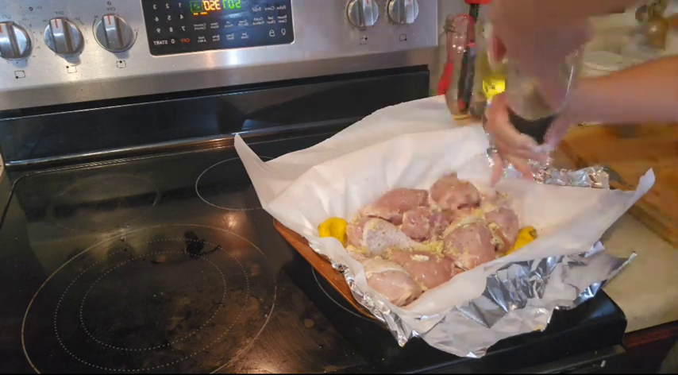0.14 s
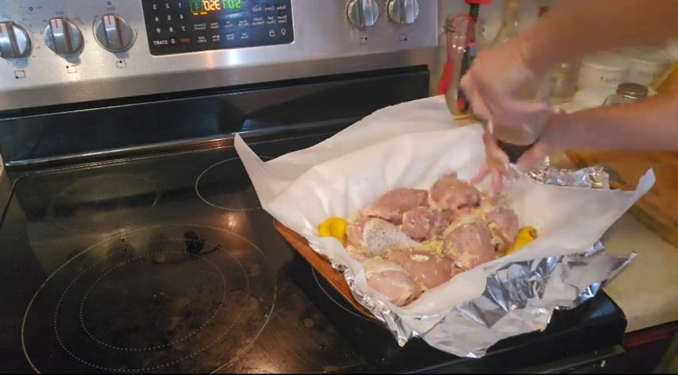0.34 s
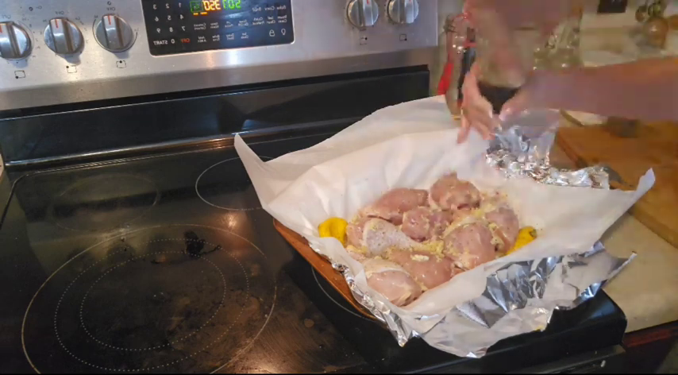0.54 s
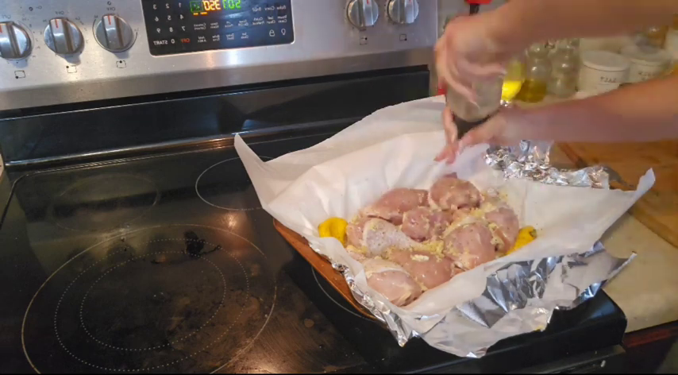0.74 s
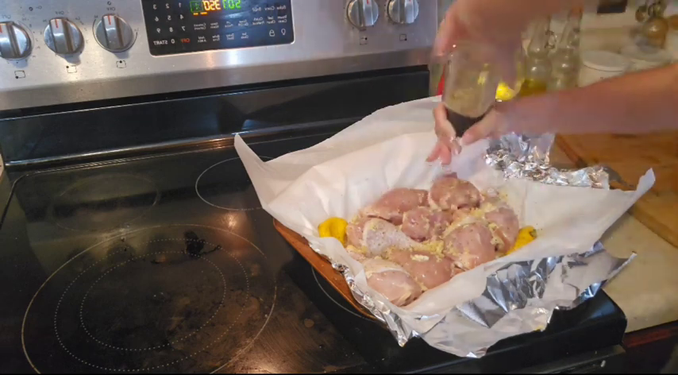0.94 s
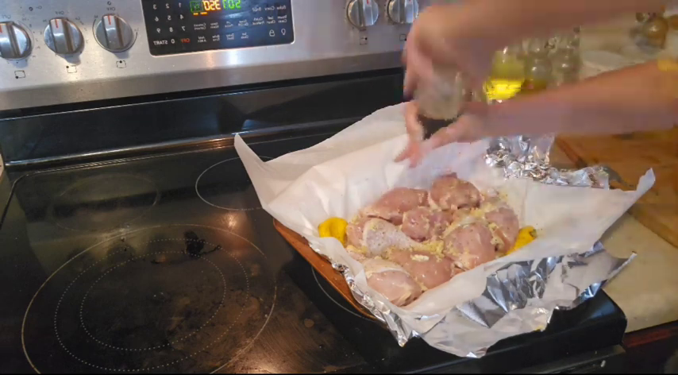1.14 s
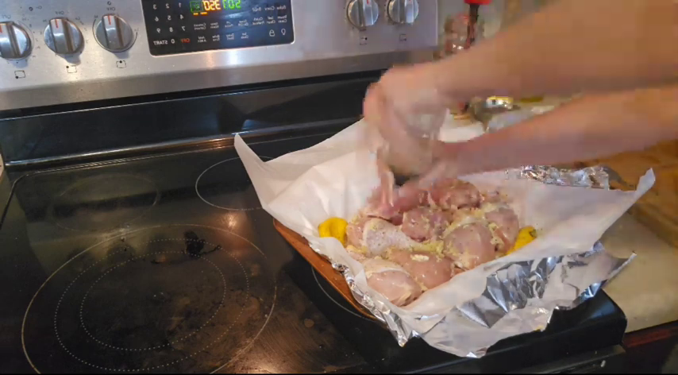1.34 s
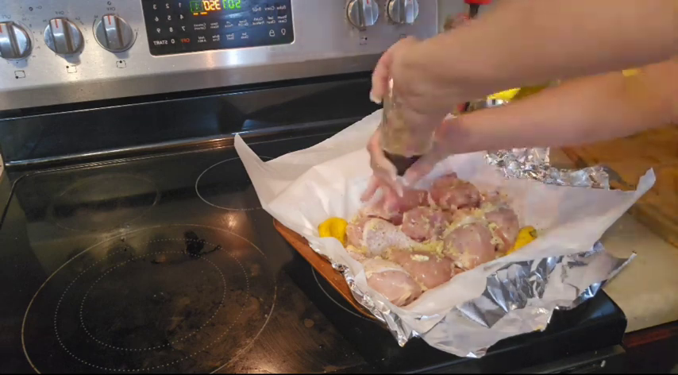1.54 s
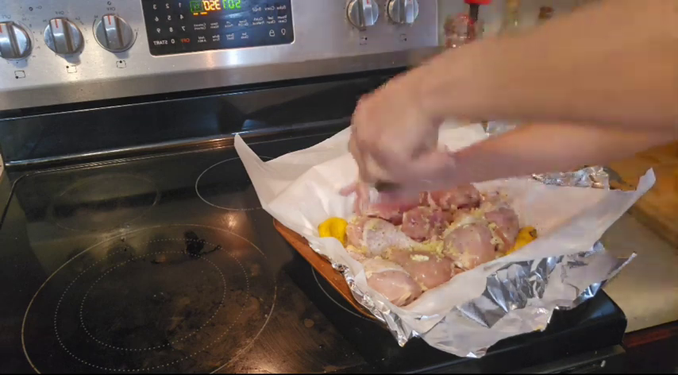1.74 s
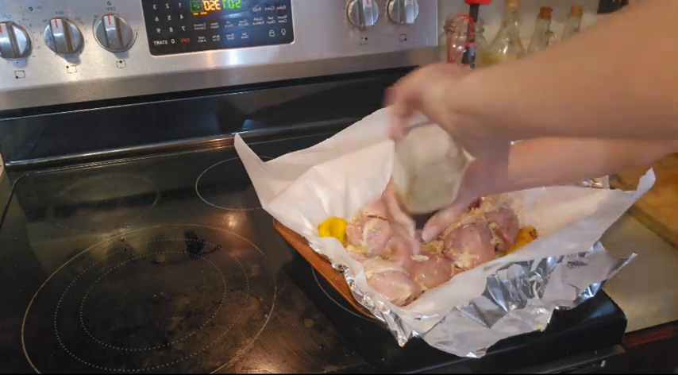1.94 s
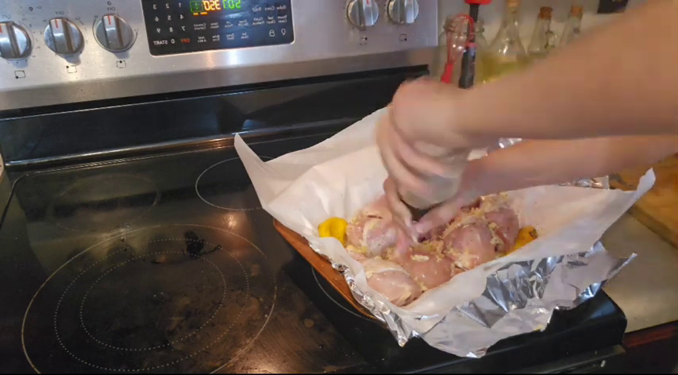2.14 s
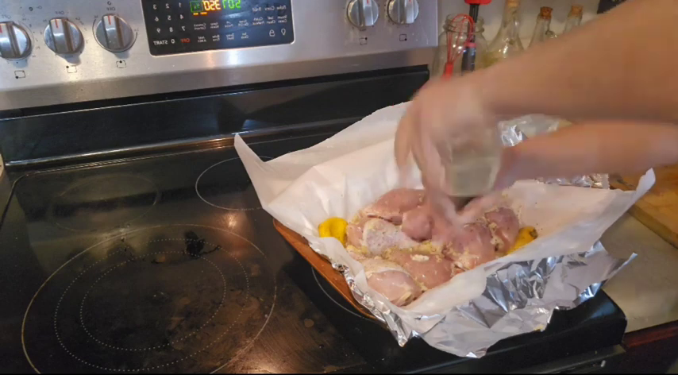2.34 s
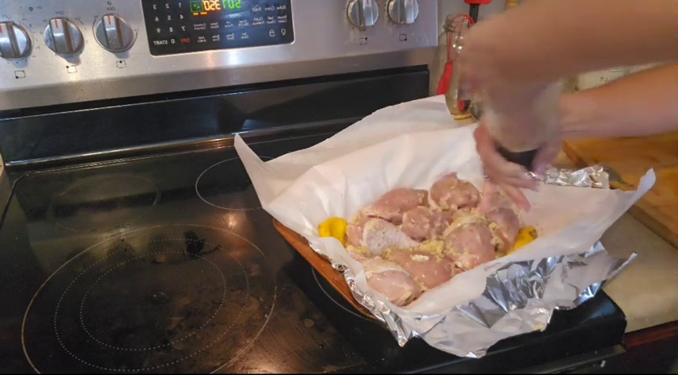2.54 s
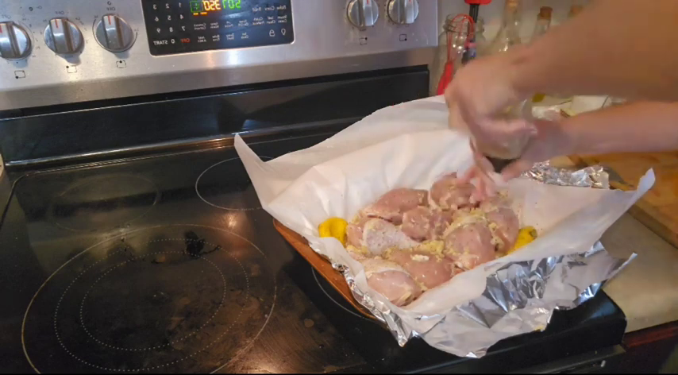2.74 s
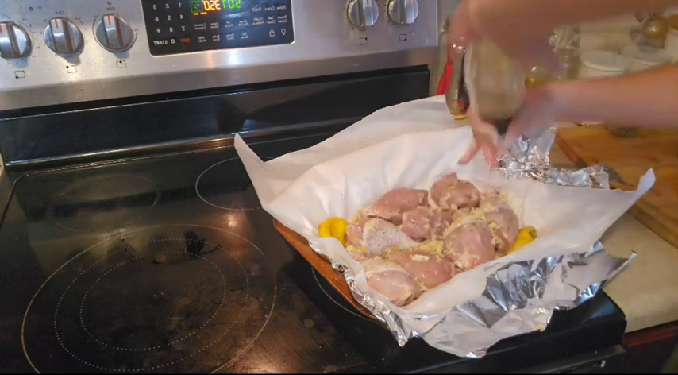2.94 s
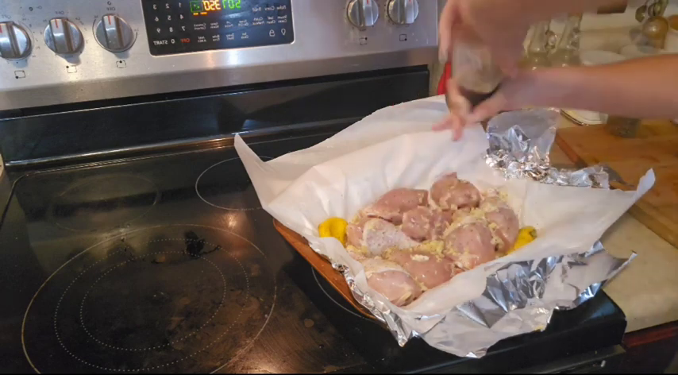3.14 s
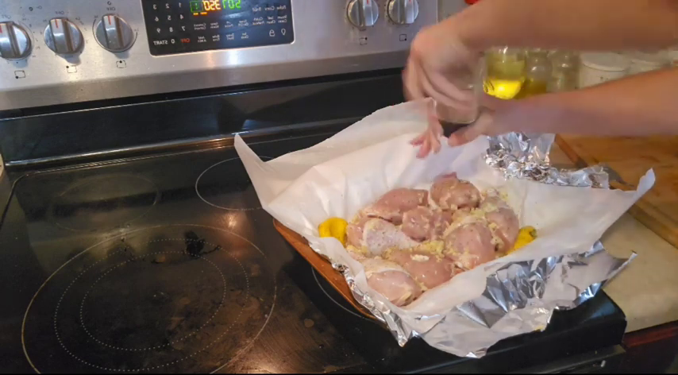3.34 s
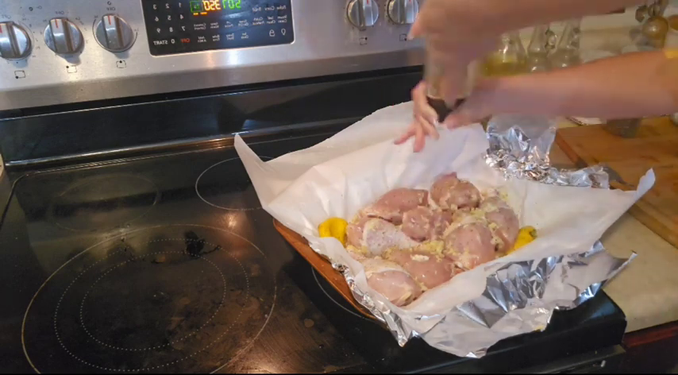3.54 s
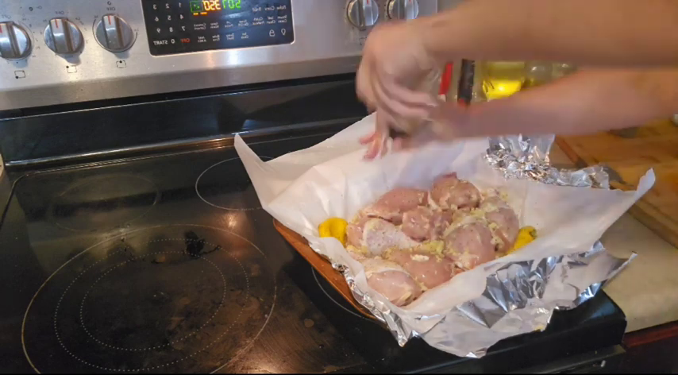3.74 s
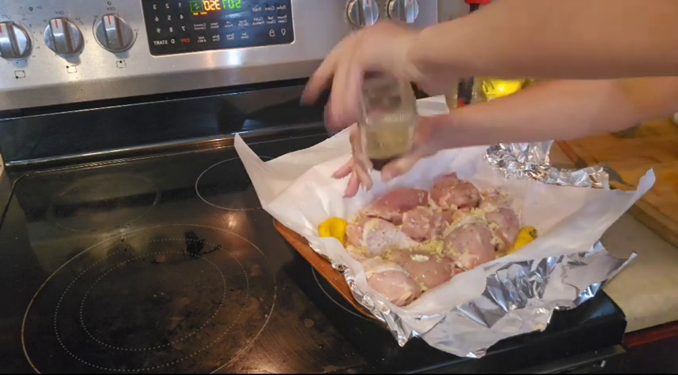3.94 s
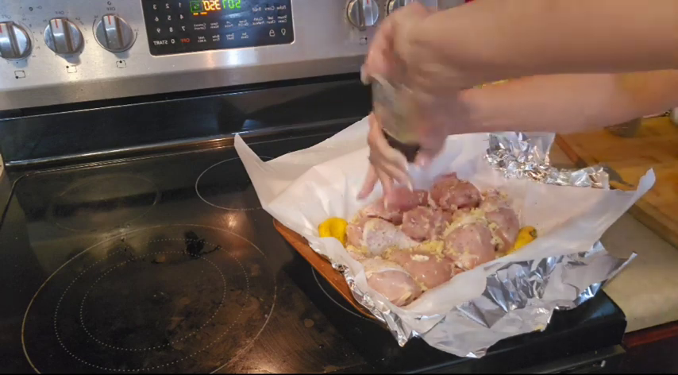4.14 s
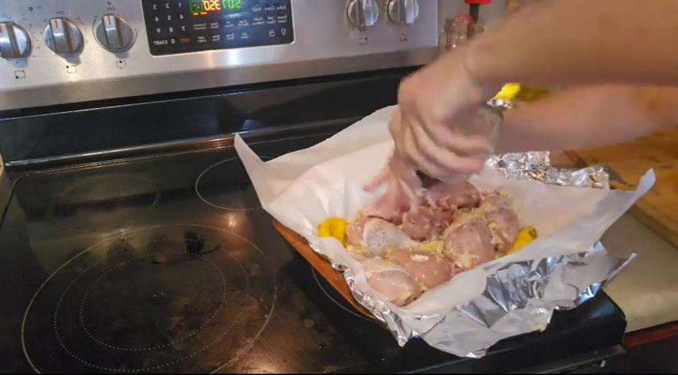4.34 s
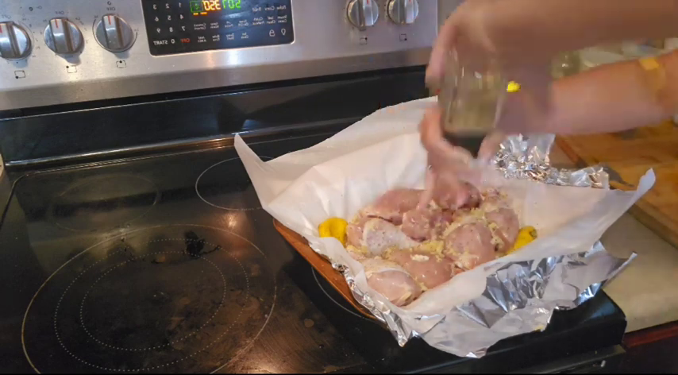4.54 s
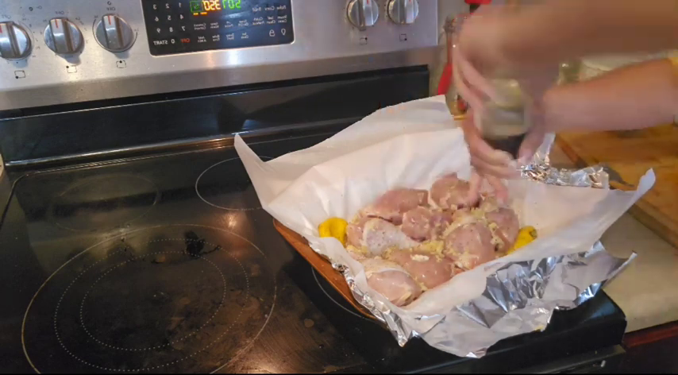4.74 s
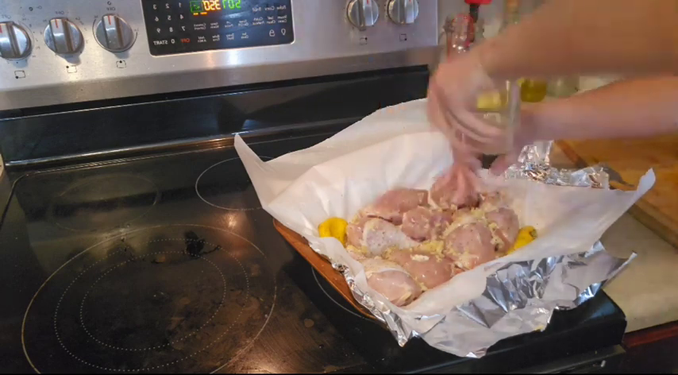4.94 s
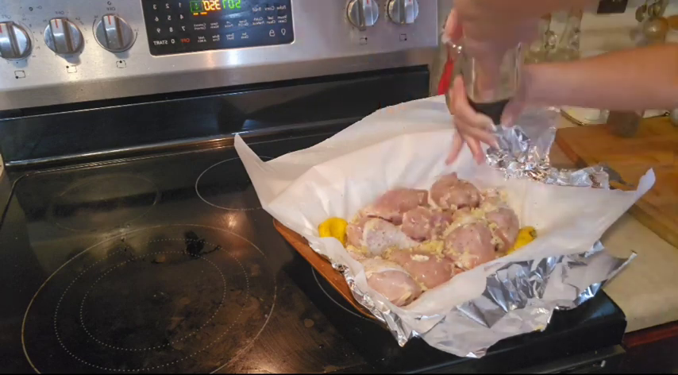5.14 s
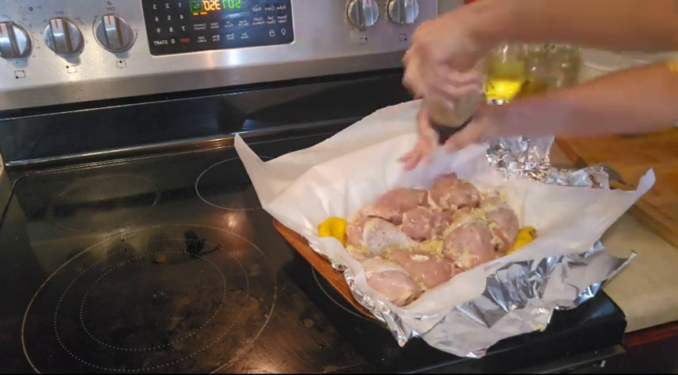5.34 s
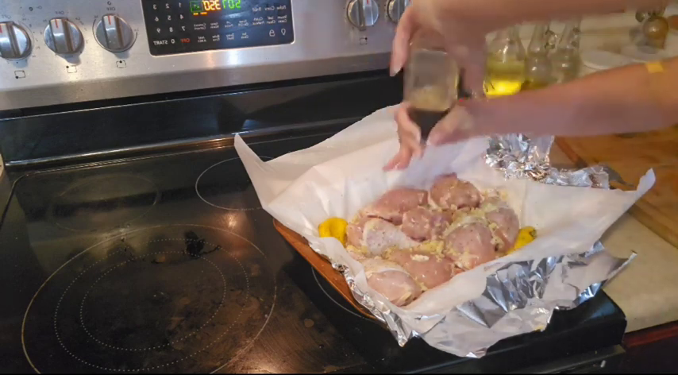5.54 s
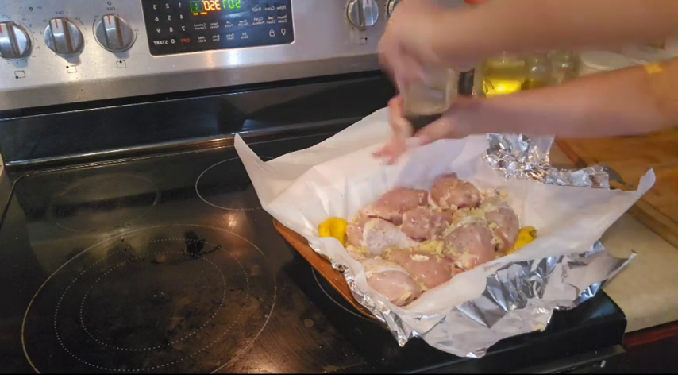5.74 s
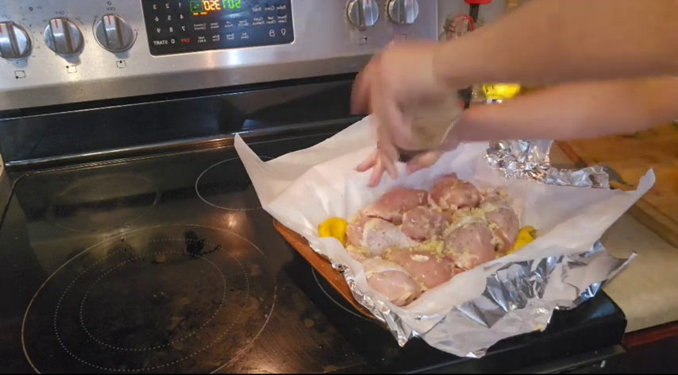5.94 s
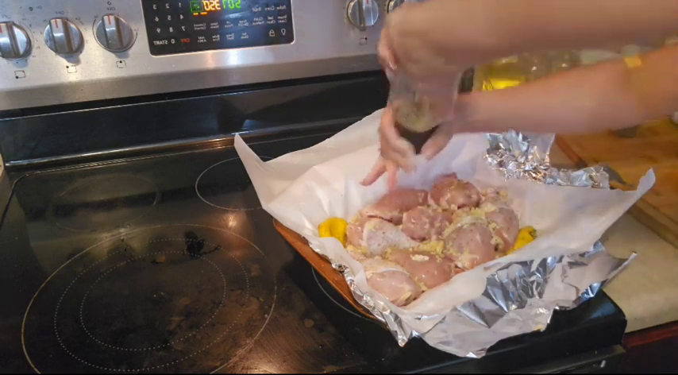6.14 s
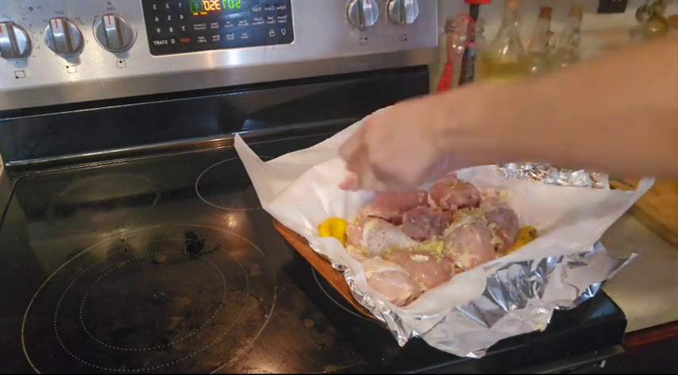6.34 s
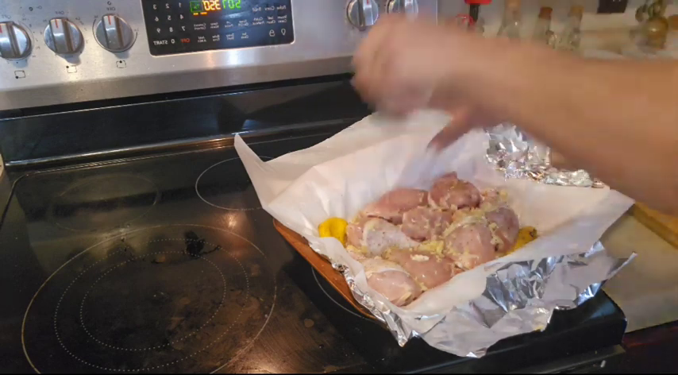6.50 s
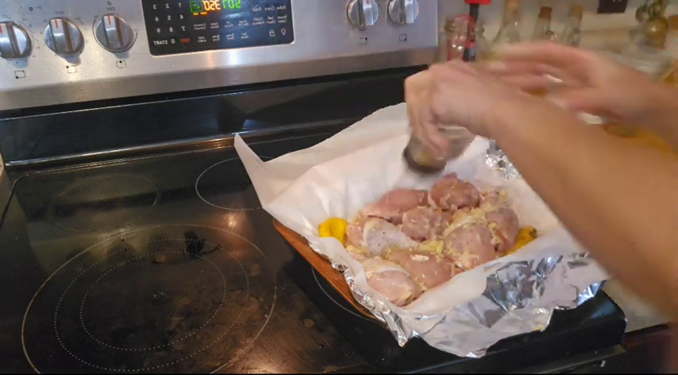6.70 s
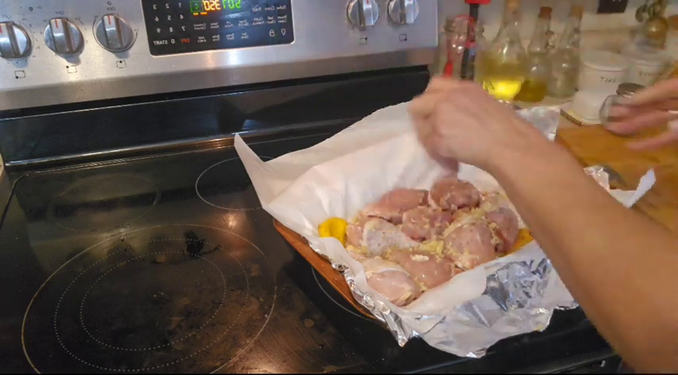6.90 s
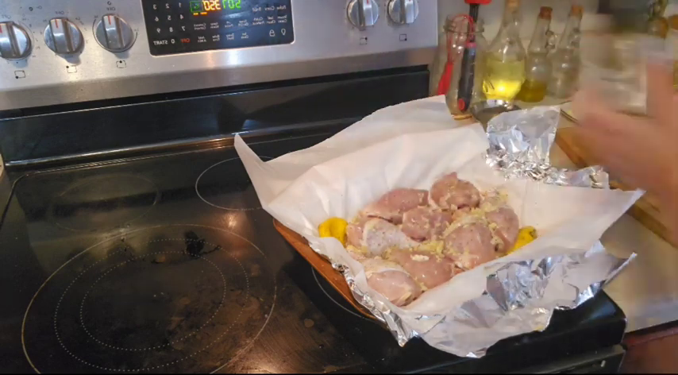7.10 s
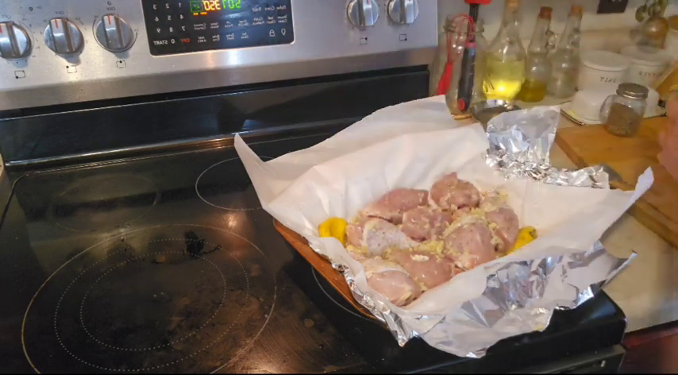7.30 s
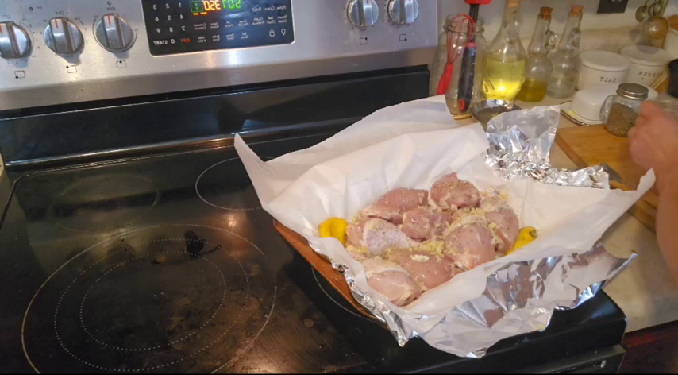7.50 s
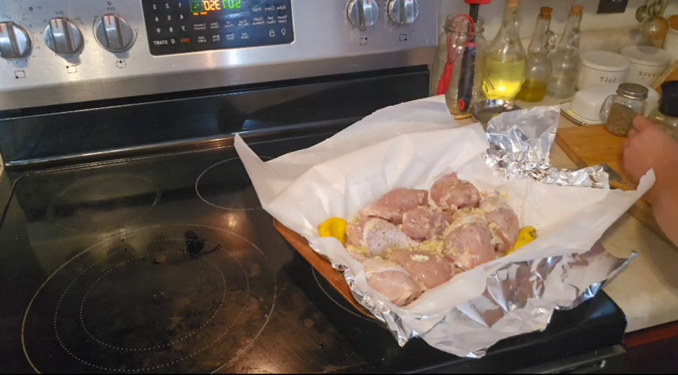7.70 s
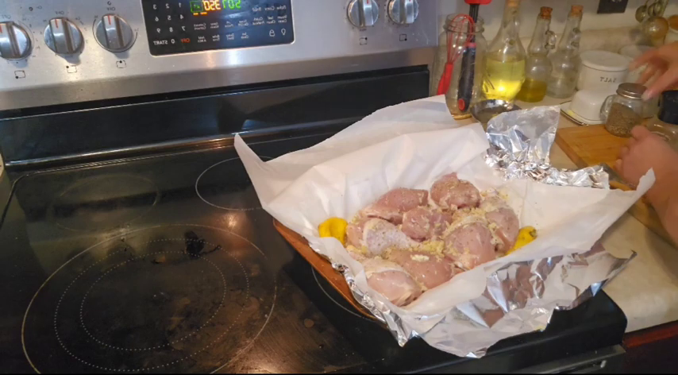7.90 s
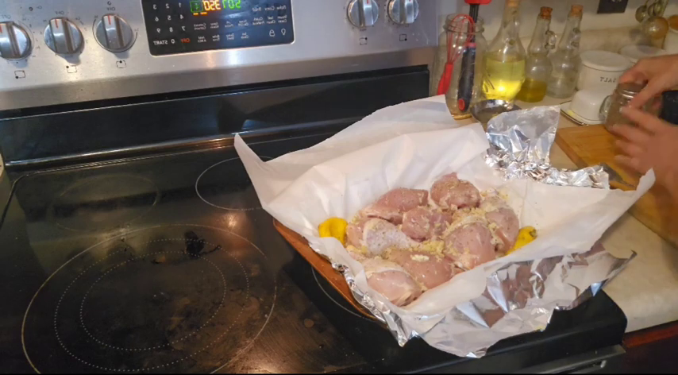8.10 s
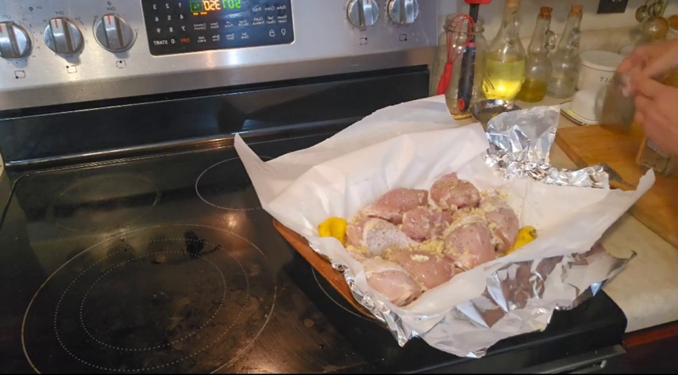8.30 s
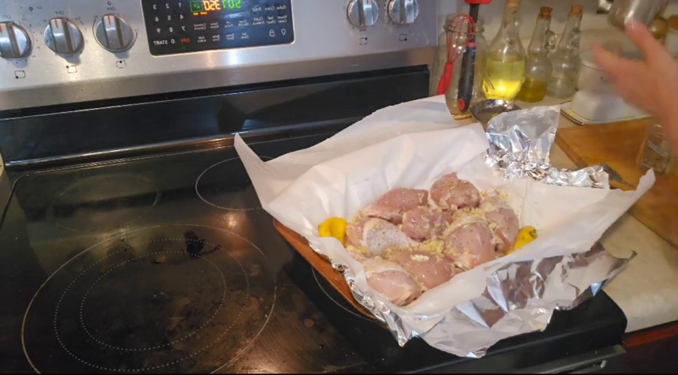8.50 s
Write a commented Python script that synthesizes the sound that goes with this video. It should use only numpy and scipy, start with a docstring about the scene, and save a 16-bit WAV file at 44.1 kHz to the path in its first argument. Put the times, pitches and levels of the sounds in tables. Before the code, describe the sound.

In a small, hard-walled kitchen, a glass herb grinder is twisted about thirteen times, roughly twice a second. Each twist is a brief, crisp crunch of dried leaves, with sharp little stalk cracks around it. Then fingers rub and softly bump the jar, and it is set down on a wooden board with a hollow knock. A low appliance hum runs throughout, heard in stereo from nearby.

```python
"""In a small, hard-walled kitchen, a glass herb grinder is twisted thirteen times over a tray of chicken.
Each twist crushes dried leaves: many tiny breaks make a dense crunch, and stalks give sharp cracks.
Between twists, skin rubs on the jar as the hand slides to a new grip. At the end the grinder is set
down on a wooden board, which knocks and rings. An appliance hums throughout."""
import sys
import numpy as np
from scipy import signal
from scipy.fft import rfft, irfft
from scipy.io import wavfile
from scipy.ndimage import uniform_filter1d

SR = 44100
rng = np.random.default_rng(int(sys.argv[2]) if len(sys.argv) > 2 else 0)


def bounce(signal):
    """Save signal as a 16-bit WAV file at the path given by the first command-line argument."""
    frames = np.transpose(np.atleast_2d(signal))
    limited = np.clip(frames, -1, 1)
    pcm = np.round(limited * 32767).astype(np.int16)
    wavfile.write(sys.argv[1], SR, pcm)


N = 381906
TIME = np.arange(N) / SR
HZ = np.fft.rfftfreq(N, 1 / SR)


# the tone of breaking leaves: f/Hz, relative level/dB
LEAF_TONE = [(530, -42.5), (900, -7), (965, -7.5), (1060, -9.5), (1810, -6), (2150, -3), (2450, -5),
             (2810, -3), (3720, -5), (6200, -0.5), (6730, -2.5), (7740, -0.5), (9320, -6), (13400, -5),
             (14500, -13)]
# twists of the grinder: start t/s, length t/s, end level/dB, rise over the twist/dB,
# boost from the ringing cap/dB, cap's note f/Hz, note's relative level/dB
TWISTS = [(0.288, 0.12, -39.5, 11.5, 2, 2920, -8), (0.783, 0.1, -48, -3.5, -1, 2870, -1),
          (1.221, 0.17, -47.5, 1, 1, 2930, 1), (1.721, 0.098, -39.5, 9.5, 4.5, 2700, -10),
          (2.25, 0.085, -43, 8.5, 5, 2800, -2.5), (2.742, 0.15, -51, -5, 3, 2630, -11),
          (3.248, 0.092, -43, 8.5, 4, 2800, -19), (3.759, 0.15, -44, 8.5, 3.5, 2780, -9),
          (4.335, 0.073, -41, 14, 3, 2850, -12), (4.85, 0.17, -45.5, 7.5, 1.5, 2710, 0),
          (5.347, .11, -45, 0.5, 3.5, 2760, -4), (5.829, 0.12, -46, 3, 3.5, 2730, 2),
          (6.319, 0.089, -45.5, 1.5, 6, 2220, 2)]

def grinding():
    """Leaves crumble between the grinder's teeth; the plastic cap rings differently with each grip."""
    crunch = unit(colour(fractures(per_s=700, spread_db=2.0, snap_s=0.00029), LEAF_TONE))
    rows = np.array(TWISTS)
    grip = np.maximum(np.searchsorted(rows[:, 0], TIME) - 1, 0)
    ring_db, note_hz, note_db = rows[grip, 4:].T
    note_hz = note_hz * (1 + 0.037 * drift(hz=12))  # the note wanders as the fingers press
    body = (amp(ring_db) - 1) * band(crunch, 2170, 3500)
    hollow = amp(note_db + ring_db) * resonate(crunch, note_hz, width_hz=340)
    effort = sum(push(*twist[:4], fade_db_per_s=243) for twist in TWISTS)
    # loose leaves scratch faintly just before the teeth bite
    scratch = amp(-61.5) * sum(swell(s - 0.0081, half_s=0.016) for s, *_ in TWISTS)
    uneven_feed = amp(2.4 * drift(hz=45))
    return (effort + scratch) * uneven_feed * (crunch + body + hollow)


def push(start, length, db, rise_db, fade_db_per_s, attack_s=0.011, arch_db=1):
    """The loudness of one twist: the teeth bite at once, work extra hard midway, then let go."""
    t = TIME - start
    done = np.clip(t / length, 0, 1)
    shape_db = rise_db * (done - 1) + arch_db * np.sin(np.pi * done)
    fade_db = fade_db_per_s * np.maximum(t - length, 0)
    return np.clip(t / attack_s, 0, 1) * amp(db + shape_db - fade_db)


def fractures(per_s, spread_db, snap_s, kinds=16):
    """A steady stream of tiny breaks of uneven size, each a very short snap of noise."""
    sizes = amp(spread_db * np.minimum(rng.exponential(1, N), 4))
    breaks = sizes * (rng.random(N) < per_s / SR)
    breaks /= np.sqrt(abs(uniform_filter1d(breaks ** 2, size=1100)) + 1e-3)  # even out the loudness
    kind, t = rng.integers(0, kinds, N), TIME[:256]
    snaps = rng.standard_normal((kinds, 2, len(t))) * np.exp(-t / snap_s)
    streams = (signal.oaconvolve((breaks * (kind == k))[None], unit(snaps[k]), axes=1)
               for k in range(kinds))
    return unit(sum(streams)[:, :N])


# single cracks: t/s, level/dB, boost near 3 kHz/dB, boost at 11 kHz/dB
STALK_CRACKS = [(.2382, -52, -1.5, 1), (0.3394, -52, 14, -16), (0.642, -62.5, 7, -22),
                (0.806, -45.5, 0, -3), (0.8736, -55, 2, -9), (1.2243, -61, 3, -43), (1.3179, -50.5, 14, -9),
                (1.337, -55, 13, -10), (1.3948, -38.5, 6.5, -7), (1.729, -48.5, -6, -5),
                (1.9764, -56.5, 10, -27), (1.993, -52.5, -4, -8), (2.0772, -55, 1, -14),
                (2.1887, -56, -3, -9), (2.308, -45, 1, 1), (2.5322, -55.5, -6, -4.5), (2.6594, -64, 2, -4),
                (2.7442, -59, -3, -9), (2.8745, -48.5, 3, 0), (3.0812, -57, 11.5, -37),
                (3.2712, -50.5, -19, -7), (3.4403, -54, 3, -1), (3.628, -60, 9, -24),
                (3.7666, -49.5, 0, -4), (3.891, -46.5, 5, 3), (4.335, -53, 5, -4), (4.4259, -43, 9.5, -6),
                (4.5869, -54, 9.5, -20), (4.6108, -55, -3, -13), (4.733, -62, -18, -28),
                (4.765, -54, 1, -1), (4.8332, -57, -1, -10), (4.8575, -49, 3, -1), (4.891, -52.5, 11, 4),
                (5.013, -45.5, -5, -12), (5.1088, -55, -3, -8), (5.156, -59, 9, -5), (5.3502, -57, 0, -22),
                (5.4021, -41, -23, -3), (5.4486, -49.5, 4, -9), (5.7, -62.5, -5, -5), (5.8905, -50, -10, 2),
                (5.9424, -46, 10, 1), (6.07, -60, 4, -7), (6.105, -59.5, -8, -8), (6.342, -48.5, 4, -7),
                (8.292, -63, 11, -2)]

def cracks(crumbs_per_s=4, tries=64):
    """Stalks crack and the cap's teeth catch; faint crumbs snap at random from first twist to last."""
    out = np.zeros((2, N))
    for s, *piece in STALK_CRACKS:
        add(out, s, crack(*piece))
    first_s = TWISTS[0][0]
    span_s = TWISTS[-1][0] - first_s
    for when, chance, size in rng.random((tries, 3)):
        crumb = crack(db=-69 + 4 * size, body_db=7, edge_db=-35)
        if chance < crumbs_per_s * span_s / tries:
            add(out, first_s + when * span_s, crumb)
    return colour(out, LEAF_TONE)


def crack(db, body_db, edge_db):
    """One piece breaks: a sharp snap, then a short spill of crumbs."""
    t = TIME[:2048]
    fall = np.exp(-t / 0.0013) + amp(-24.5) * np.exp(-t / 0.014)
    rise_s = np.interp(db, [-54.5, -43.5], [.0011, .0003])  # big pieces part at once, small ones give way
    burst = rng.standard_normal((2, len(t))) * fall * (1 - np.exp(-t / rise_s))
    click_at = 20 + rng.choice(np.arange(3), size=2)  # the click reaches each side at its own instant
    burst[[0, 1], click_at] += amp(np.interp(db, [-61.5, -41.5], [3, 14]))
    tone = [(900, body_db - 17), (1600, body_db - 10), (2300, body_db - 4), (3200, body_db),
            (4800, 0), (8000, 0), (11000, edge_db)]
    return amp(db) * unit(colour(burst, tone))


# the jar's blows on the board: t/s, relative level/dB
JAR_BLOWS = [(7.9933, 5), (7.998, -18), (8.005, 0.5), (8.015, -7.5)]
# the tone of the knock: f/Hz, relative level/dB
KNOCK_TONE = [(100, -28), (300, 4), (450, -2), (700, 0), (950, -5.5), (1200, -7.5), (1500, -16.5),
              (2000, -11.5), (2800, -25), (4500, -27.5), (6500, -24.5), (8000, -39.5), (11000, -72)]
# the notes of the board and counter: f/Hz, relative level/dB, time to fade by 60 dB t/s
BOARD_NOTES = [(59.2, 0.5, 0.29), (119, -9, 0.27), (150, -13.5, 0.28), (212, -13.5, 0.26),
               (267.7, -8, 0.23), (320, -34, 0.11), (371, -3.5, 0.12), (420, -26, 0.21), (539, -21, 0.26),
               (613, -31, 0.23), (622, -18, 0.17), (844, -6, 0.053), (1153, -14, 0.13)]

def set_down():
    """The jar lands and rocks on its base: it knocks, and the wooden board rings on."""
    t, start = TIME[:SR], JAR_BLOWS[0][0]
    blows, ring, out = np.zeros((2, SR)), np.zeros(SR), np.zeros((2, N))
    for s, db in JAR_BLOWS:
        add(blows, s - start, amp(db) * np.ones((2, 1)))
    echoing = kitchen(blows, near_db=10.0, near_s=0.008, tail_db=2.0)
    knock = colour(diffuse(echoing, width_hz=55), KNOCK_TONE)
    for hz, db, fade_s in BOARD_NOTES:
        build_up = 1 - np.exp(-(t * hz / 1.43) ** 2)  # each note takes about one swing to get going
        ring += amp(db - 60 * t / fade_s) * np.sin(2 * np.pi * hz * t) * build_up
    add(out, start, amp(3.5) * knock + amp(-19.0) * ring)
    return out


# the tone of the fine rustle: f/Hz, relative level/dB
RUSTLE_TONE = [(600, -45), (1500, -15), (3000, -4.5), (5000, -9.5), (5500, -1.5), (6000, -1), (7700, -6.5),
               (10500, -14.5), (12200, -8.5), (14500, -16.5)]
# the fading rustle of an earlier twist, then rubs on the jar:
# middle t/s, half length t/s, rustle level/dB, glass note level/dB
RUSTLES = [(0, 0.07, -53, -83), (2.213, 0.038, -65, -54), (3.24, 0.034, -57, -68), (4.737, 0.27, -61, -77),
           (6.524, 0.085, -49, -75), (6.832, 0.043, -53, -68), (6.762, .02, -60, -69),
           (7.014, .075, -56.5, -72), (7.135, .015, -64.5, -69), (7.377, 0.031, -55, -65),
           (7.529, 0.017, -60, -70), (7.974, 0.023, -55.5, -85)]

def handling(glass_hz=5620):
    """An earlier twist fades, then skin rubs a thin note from the glass; flakes fall after each twist."""
    grains = fractures(per_s=2500, spread_db=1.0, snap_s=0.00034)
    rustle = unit(colour(grains, RUSTLE_TONE))
    glass = unit(resonate(grains, glass_hz, width_hz=290))
    trickle = amp(-19) * sum(push(*twist[:4], fade_db_per_s=61) for twist in TWISTS)
    rustles = sum(swell(s, half_s) * (amp(db) * rustle + amp(glass_db) * glass)
                  for s, half_s, db, glass_db in RUSTLES)
    return trickle * band(rustle, 840, 9000) + rustles


# fingertips bumping the jar: t/s, level/dB
FINGER_BUMPS = [(3.081, -47.5), (6.731, -54), (6.85, -61), (6.99, -51), (7.515, -56)]

def bumps(note_hz=1310):
    """A soft fingertip wakes one low note of the jar, which dies away quickly."""
    t, out = TIME[:6000], np.zeros((2, N))
    ring = np.sin(2 * np.pi * note_hz * t) * np.exp(-t / 0.017) * (1 - np.exp(-t / 0.0015))
    for s, db in FINGER_BUMPS:
        add(out, s, amp(db) * ring)
    return out


# the motor's faint notes: f/Hz, level/dB, pitch wander f/Hz
MOTOR_NOTES = [(62.3, -74, .1), (85.1, -63, .2), (213.3, -70, 0.4), (240.3, -65, 1.81),
               (348.2, -73.5, 0.41), (359.4, -75.5, 0.29), (484, -79, 1.05), (611.6, -71.5, 1.52),
               (647, -74.5, 0.3), (725, -77.5, 1.05), (854, -73.5, 2.55), (1210, -74, 9), (1312, -72, 12),
               (1426, -77, 3.4), (1867, -72.5, 8.3), (2137, -75.5, 16.8)]
# the tone of rushing air: f/Hz, relative level/dB
AIR_TONE = [(150, -3.5), (250, -5.5), (319, -8.5), (478, -9.5), (694, -10.5), (870, -16.5), (1150, -15.5),
            (1640, -15), (2300, -16), (2650, -20), (5300, -21.5), (7500, -27.5), (8800, -36), (11000, -97)]
# the tone of the low rumble: f/Hz, relative level/dB
RUMBLE_TONE = [(12, -30), (25, -2.5), (42, 9.5), (55, 5), (70, -6), (100, 0), (125, 0), (160, -7),
               (230, -6.5), (300, -11.5), (450, -63)]

def appliance(hum_hz=120):
    """An electric hum and wavering motor notes sit over a rumble and a soft rush of air."""
    # the hum dips briefly as each twist starts and just after it ends
    dips_db = sum(1.5 * swell(s, 0.022) + 4.5 * swell(s + length + 0.082, 0.022)
                  for s, length, *_ in TWISTS)
    hum_db = -41 + 0.78 * drift(hz=4.2) - dips_db
    hum = amp(hum_db) * np.sqrt(2) * np.sin(2 * np.pi * hum_hz * TIME + np.array([[0], [.2]]))
    motor = np.zeros((2, N))
    for hz, db, wander_hz in MOTOR_NOTES:
        waver = 2 * np.pi * np.cumsum(wander_hz * drift(hz=13.1)) / SR
        side_shift = np.arccos(np.clip(look_up(LIKENESS, hz), -1, 1)) * np.array([[0], [1]])
        motor += amp(db) * np.sqrt(2) * np.sin(2 * np.pi * hz * TIME + waver + side_shift)
    return hum + motor + amp(-56) * steady_noise(AIR_TONE) + amp(-51.5) * steady_noise(RUMBLE_TONE)


def steady_noise(tone):
    """An even rush of noise with the given tone."""
    noise = blend_sides(rng.standard_normal((2, N)))
    return unit(irfft(rfft(noise) * amp(look_up(tone, HZ)), N))


# how long the room rings: f/Hz, time to fade by 60 dB t/s
ROOM_FADE = [(100, 0.64), (400, 0.67), (1000, 0.79), (3000, 0.58), (8000, 0.66), (11000, 0.52),
             (14000, 0.41)]

def kitchen(x, near_db, near_s, tail_db):
    """Sound arrives directly, then bounces off the stove and wall, then dies away in the room."""
    t = TIME[:SR]
    bounces = rng.standard_normal((2, SR)) * (rng.random((2, SR)) < .15)
    near = bounces * (t > .0012) * np.exp(-t / near_s)
    hz, times, bands = signal.stft(rng.standard_normal((2, SR)), SR, nperseg=256)
    fade = amp(-60 * times / look_up(ROOM_FADE, hz)[:, None])
    tail = signal.istft(bands * fade, SR, nperseg=256)[1][:, :SR] * (1 - np.exp(-t / 0.0013))
    echoes = blend_sides(amp(near_db) * unit(near) + amp(tail_db) * unit(tail)) / np.sqrt(SR)
    echoes[:, 0] += 1  # the direct sound
    return signal.fftconvolve(x, diffuse(echoes, width_hz=420), axes=1)[:, :x.shape[1]]


def diffuse(x, width_hz):
    """Dense echoes favour no pitch, so this evens out their tone and sets their energy to 1."""
    spectrum = rfft(x, 2 * SR)
    power = uniform_filter1d(abs(spectrum) ** 2, size=int(2 * width_hz), axis=1)
    flat = irfft(spectrum / np.sqrt(abs(power) + 1e-12), 2 * SR)[:, :SR]
    return flat / np.linalg.norm(flat, axis=1, keepdims=True)


# how alike left and right sound: f/Hz, likeness (0 unrelated, 1 the same)
LIKENESS = [(30, 0.97), (130, 1), (250, 0.87), (400, 0.66), (700, 0.54), (1300, 0.26), (2400, 0.13),
            (8000, 0.016)]

def blend_sides(x):
    """Two microphones close together hear nearly the same bass but different treble."""
    same = np.clip(look_up(LIKENESS, np.fft.rfftfreq(x.shape[1], 1 / SR)), -1, 1)
    left, other = rfft(x)
    right = same * left + np.sqrt(1 - same ** 2) * other
    return irfft(np.array([left, right]), x.shape[1])


def amp(db):
    """Turns decibels into a number to multiply by."""
    return 10 ** (np.asarray(db) / 20)


def unit(x):
    """Scales a sound to an average strength (rms) of 1."""
    return x / np.sqrt(np.mean(x ** 2) + 1e-20)


def look_up(table, hz):
    """Reads between a table's rows, giving each octave equal room."""
    f, value = np.transpose(table)
    return np.interp(np.log(hz + 1), np.log(f + 1), value)


def add(mix, s, sound):
    """Mixes a sound in, starting at s seconds."""
    part = mix[..., round(s * SR):][..., :sound.shape[-1]]
    part += sound[..., :part.shape[-1]]


def colour(x, tone, size=2048):
    """Gives a sound the tone in a table, with no ringing ahead of a click."""
    log_gain = np.log(amp(look_up(tone, abs(np.fft.fftfreq(size, 1 / SR)))))
    taps = np.fft.ifft(np.exp(np.conj(signal.hilbert(log_gain)))).real
    return signal.oaconvolve(x, (taps / np.linalg.norm(taps))[None], axes=1)[:, :x.shape[1]]


def band(x, lo_hz, hi_hz):
    """Gently turns down everything outside two frequencies."""
    return signal.sosfilt(signal.butter(2, [lo_hz, hi_hz], "band", fs=SR, output="sos"), x)


def resonate(x, hz, width_hz):
    """Passes a sound twice through a filter that rings at one note, which may move."""
    turn = np.exp(2j * np.pi * np.cumsum(hz * np.ones(N)) / SR)
    decay = np.exp(-np.pi * width_hz / SR)
    for _ in range(2):
        x = 2 * (turn * signal.lfilter([1 - decay], [1, -decay], x / turn + 1e-18)).real
    return x


def drift(hz):
    """A random wobble of strength 1, up to about hz times a second."""
    return unit(irfft(rfft(rng.standard_normal(N)) / (1 + (HZ / hz) ** 4), N))


def swell(s, half_s):
    """A smooth hump of height 1 around s seconds."""
    return np.exp(-np.minimum(((TIME - s) / half_s) ** 2, 50))


def scene(spots=4, moves_per_s=5):
    """The hands wander over the tray, so the echoes keep changing; the board and appliance join in."""
    herbs = grinding() + cracks() + handling() + bumps()
    heard = np.zeros((2, N))
    for spot in range(spots):
        distance = abs((TIME * moves_per_s + spot) % spots - spots / 2)
        share = np.cos(np.pi / 2 * np.minimum(distance, 1))
        heard += kitchen(herbs * share, near_db=4, near_s=0.0089, tail_db=-2.5)
    return heard + set_down() + appliance()


# how the tone leans to one side: f/Hz, relative level of left over right/dB
SIDE_LEAN = [(100, 1.3), (400, .3), (2000, 0), (5000, -.5), (6300, -5), (7000, 1.5), (7800, 9), (9500, 9),
             (11000, 4), (13000, 2.5), (14300, -1)]

def record(dry, top_hz=14750):
    """Each microphone colours the treble in its own way, and the very highest sounds are cut."""
    lean = amp(look_up(SIDE_LEAN, HZ) * np.array([[.5], [-.5]]))
    heard = irfft(rfft(dry) * lean / np.sqrt(np.mean(lean ** 2, axis=0)), N)
    treble_cut = signal.firwin(401, top_hz, window=("kaiser", 8), fs=SR)
    return signal.oaconvolve(heard, treble_cut[None], "same")


dry = scene()
out = record(dry)
bounce(out)
```